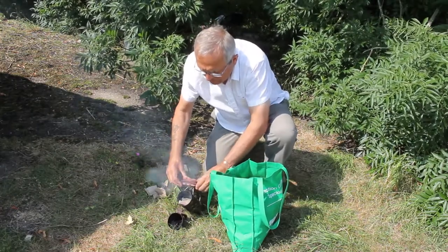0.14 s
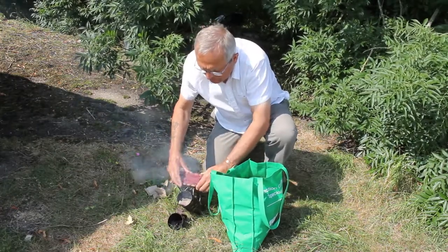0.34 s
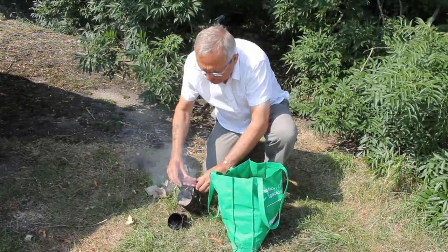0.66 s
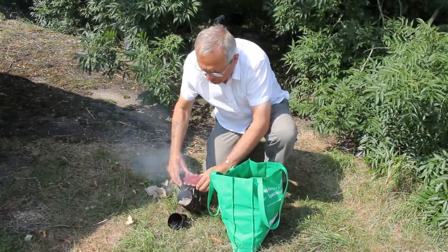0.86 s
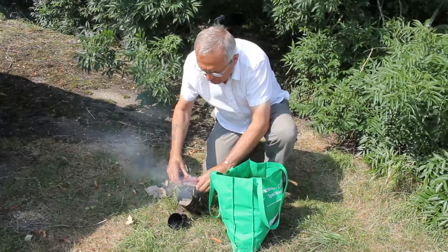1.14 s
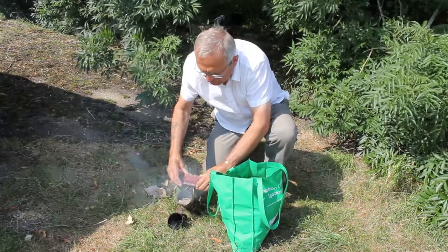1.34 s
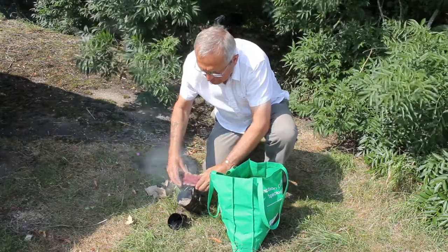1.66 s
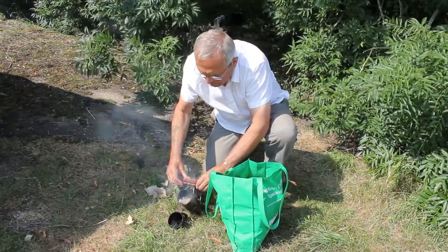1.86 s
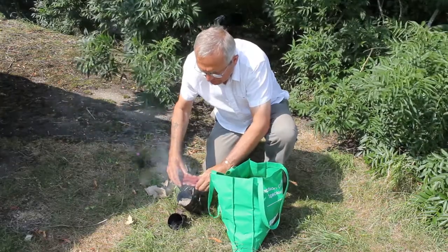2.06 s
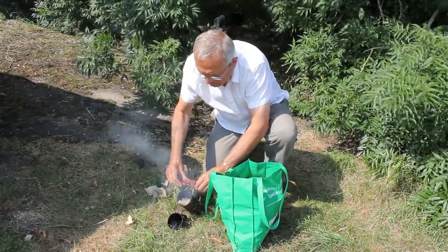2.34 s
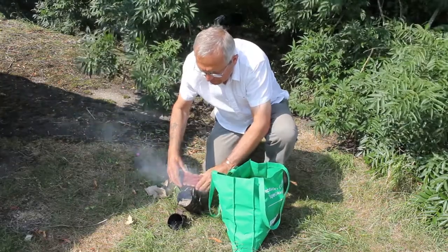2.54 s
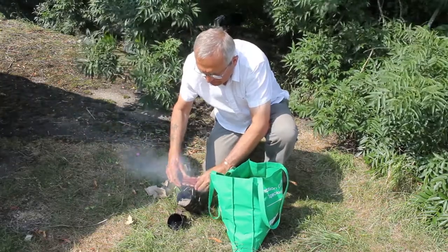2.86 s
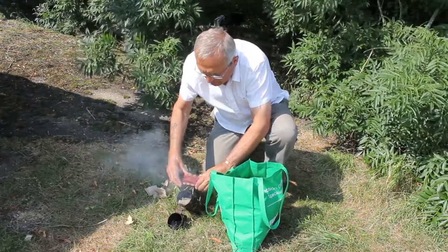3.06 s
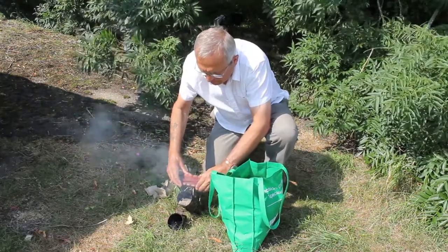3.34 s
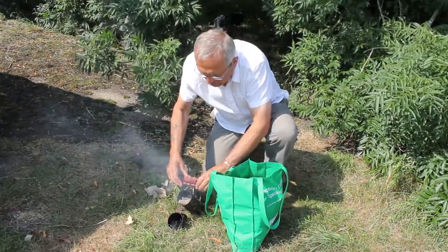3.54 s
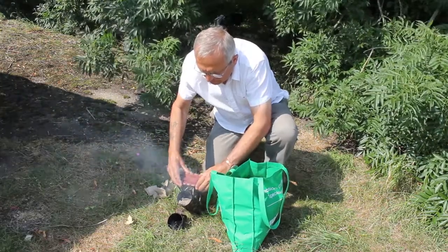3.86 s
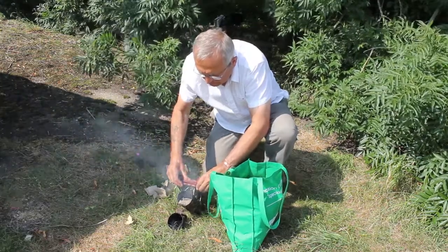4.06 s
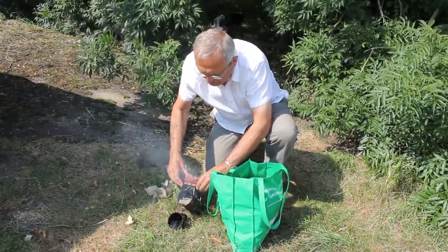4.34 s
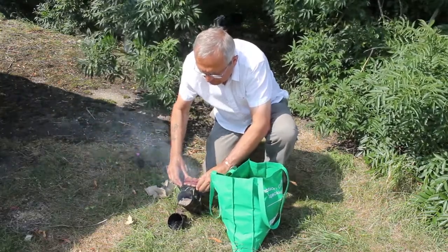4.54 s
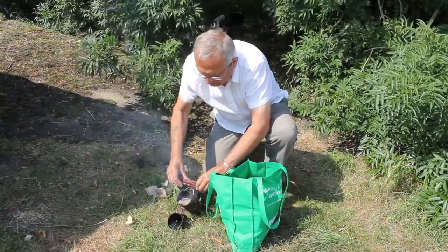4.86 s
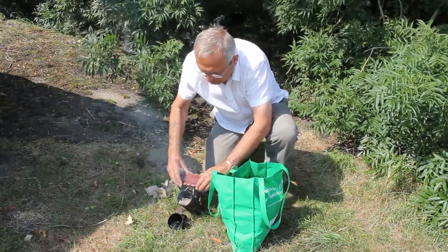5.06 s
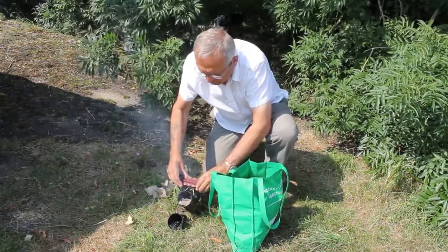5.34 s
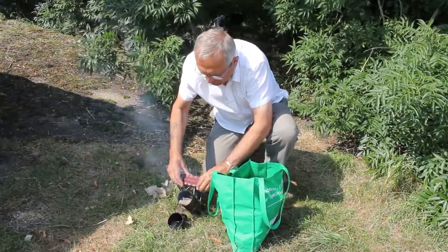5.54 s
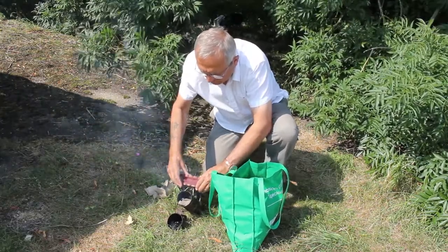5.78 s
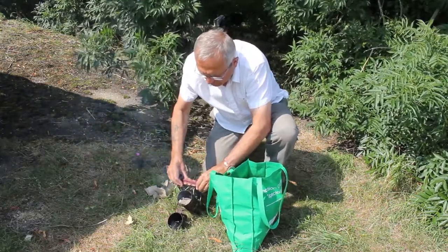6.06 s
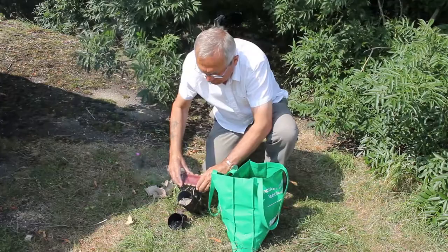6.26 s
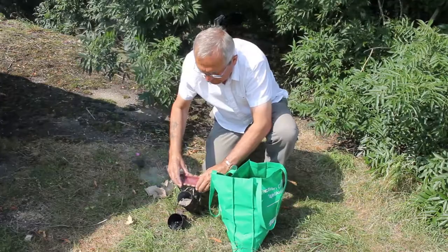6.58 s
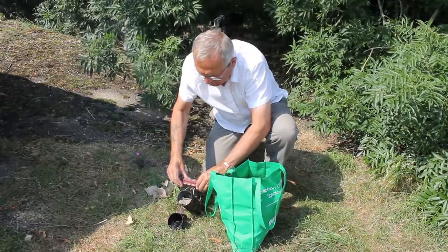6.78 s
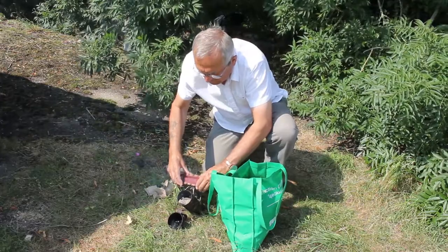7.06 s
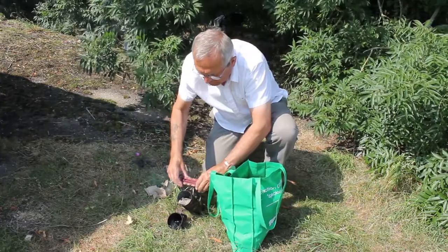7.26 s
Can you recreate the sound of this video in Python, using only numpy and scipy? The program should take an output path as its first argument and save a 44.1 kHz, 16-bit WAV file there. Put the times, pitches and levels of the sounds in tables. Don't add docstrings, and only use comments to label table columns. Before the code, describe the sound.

Small hand bellows pumped briskly outdoors, short breathy huffs roaring through a tin can, each followed by a thin hiss and a hard pop.

```python
import sys
import numpy as np
from scipy import signal
from scipy.fft import rfft, irfft, next_fast_len
from scipy.io import wavfile

SR = 44100
rng = np.random.default_rng(int(sys.argv[2]) if len(sys.argv) > 2 else 0)


def wav_record(signal):
    frames = np.transpose(np.atleast_2d(signal))
    bounded = np.clip(frames, -1, 1)
    quanta = np.round(bounded * 32767).astype(np.int16)
    wavfile.write(sys.argv[1], SR, quanta)


def how_loud(loudness_db):
    steps = np.asarray(loudness_db, float) / 20
    return 10 ** steps


N = 327222
T = np.arange(N) / SR

# (start [s], length [s], nozzle jet [dB], can roar [dB], cavity hoot [dB])
SQUEEZES = [(0.019, 0.15, -36, -23, -23), (0.505, 0.14, -37, -22.5, -22), (0.967, 0.13, -34, -22, -20.5),
            (1.417, 0.14, -37, -23, -24.5), (1.858, 0.14, -33, -20, -25), (2.294, 0.12, -34.5, -19.5, -29),
            (2.714, 0.12, -34, -21, -23), (3.145, 0.13, -32, -21.5, -23), (3.574, 0.13, -35, -20, -25.5),
            (3.993, 0.12, -33, -20.5, -23.5), (4.407, 0.12, -31, -19.5, -22.5),
            (4.826, 0.11, -31.5, -18.5, -25.5), (5.214, 0.12, -34.5, -20.5, -19),
            (5.618, 0.12, -32.5, -20, -23.5), (6.012, 0.11, -33.5, -22, -24.5),
            (6.39, 0.12, -32, -20.5, -22), (6.791, 0.12, -34, -21.5, -23.5), (7.159, 0.12, -30, -21.5, -20)]
RINGING_DB = [-2, -2.5, 0, -1, -6.5, -2.5, -3, -2, -6.5, 0, -4, 0.5, -2, -4, 1.7, 0.5, 0.7, 0.5]
# (frequency [Hz], density [dB per Hz])
JET_SPECTRUM = [(2350, -57), (4000, -5.5), (4640, -6.5), (5110, -4.5), (5340, -4.5), (6190, -7.5),
                (6980, -5), (9700, -4.5), (13000, -9), (15600, -17)]
# (frequency [Hz], density [dB per Hz])
ROAR_SPECTRUM = [(65, -35), (110, 1.5), (284, -5), (521, -3), (584, -5.5), (711, -26), (810, -8.5),
                 (1140, -11.5), (1530, -10), (1840, -10), (3150, -8), (4230, -21.5), (5500, -27.5),
                 (7150, -27), (12100, -120)]
# (frequency [Hz], width [Hz], level [dB])
CAN_MODES = [(1190, 180, 8), (1410, 91, 7.5), (2530, 77, -2), (2980, 170, 3), (3260, 71, -3),
             (3520, 280, 5.5), (3800, 140, 11)]
# (order, level [dB], length [s])
TUBE_PARTIALS = [(1, -17, 0.016), (2, 7, 0.0093), (3, -6.5, 0.0096), (4, 3.5, 0.0054)]
# (time [s], peak [dB], fourth partial [Hz])
WHISTLES = [(4.4368, -33, 5150), (4.8385, -30.5, 5040), (5.246, -29.5, 5040), (5.6448, -28.5, 5060),
            (6.0349, -25.5, 5020), (6.412, -24.5, 5000), (6.8064, -27, 5040), (7.1863, -27.5, 5020)]
# (fastest flow [s], stop [s], level [dB])
DRAWS = [(0.296, 0.437, -42), (0.805, 0.9, -40.5), (1.236, 1.373, -41.5), (1.694, 1.816, -40),
         (2.133, 2.243, -39.5), (2.557, 2.674, -40), (2.974, 3.064, -40.5), (3.378, 3.525, -40),
         (3.817, 3.93, -39.5), (4.257, 4.358, -41), (4.656, 4.786, -40), (5.09, 5.157, -39.5),
         (5.47, 5.55, -39.5), (5.847, 5.953, -41), (6.25, 6.344, -40), (6.643, 6.724, -40.5),
         (7.043, 7.108, -40), (7.393, 7.51, -39.5)]
# (frequency [Hz], density [dB per Hz])
INTAKE_SPECTRUM = [(1180, -29), (2000, 0), (2200, -5.5), (3150, -2.5), (3650, -6), (6000, -4), (6650, -7.5),
                   (8460, -5.5), (9780, -3.5), (14500, -19), (15600, -19)]
# (frequency [Hz], width [Hz], level [dB])
INLET_MODES = [(3100, 640, -1.5), (8600, 380, -5), (11830, 430, 4), (12600, 300, -7), (14300, 450, 8)]
# (time [s], boards [dB], plate [dB], hinge [dB])
POPS = [(0.4024, -9, -21, -8), (0.8807, -9, -30, -10), (1.3356, -9.5, -28, -12), (1.7832, -9.5, -42, -10),
        (2.202, -16, -27, -40.0), (2.2027, -7, -15, -1.5), (2.6206, -40, -24.9, -40.0),
        (2.622, -8.5, -24.7, 0), (3.0106, -6, -30, -9), (3.4602, -17, -24, -9), (3.4619, -11, -15, -2.5),
        (3.8906, -19, -40, -40), (3.8911, -7, -34, -1.5), (5.1194, -33, -12, -7), (5.12, -6.5, -15, 5.5),
        (5.4891, -5.5, -7.5, 0), (5.8874, -9.5, -5.5, -19), (6.266, -8.5, -6.5, -0.5),
        (6.6615, -10, -7, -4), (7.0475, -6.5, -4, -1.5), (7.4164, -7.5, -4.5, -15)]
# (frequency [Hz], level [dB], t60 [s])
BOARD_MODES = [(172, 0.3, 0.038), (352, 2.4, 0.021), (646, -5.3, 0.018), (1480, -11, 0.005)]
# (frequency [Hz], level [dB], t60 [s])
PLATE_MODES = [(837, 7.3, 0.0068), (1862, -2.4, 0.0032)]
# (frequency [Hz], level [dB], t60 [s])
HINGE_MODES = [(3330, 18, 0.0022)]
# (time [s], peak [dB], frequency [Hz], t60 [s])
TICKS = [(0.493, -17, 1430, 0.0039), (0.519, -35, 1290, 0.0044), (0.867, -24, 851, 0.0067),
         (0.959, -9, 1310, 0.0019), (1.32, -25, 859, 0.0091), (1.414, -10.5, 1410, 0.0027),
         (1.764, -15.5, 894, 0.0018), (1.858, -17, 840, 0.0061), (2.285, -9.5, 1190, 0.0017),
         (2.606, -13, 880, 0.0021), (2.714, -7, 1270, 0.0019), (3.141, -9.5, 1240, 0.0039),
         (3.563, -12, 1120, 0.0038), (3.862, -11, 1110, 0.0021), (3.985, -11, 1200, 0.003),
         (4.181, -28, 910, 0.005), (4.602, -26, 1180, 0.0071), (4.713, -17, 1140, 0.0033),
         (5.006, -27, 1200, 0.0058), (5.103, -12, 870, 0.0018), (5.211, -8, 1100, 0.0029),
         (5.612, -5, 1140, 0.0031), (6.783, -9.5, 1190, 0.0016), (7.198, -18, 800, 0.0025),
         (0.395, -29, 1000, 0.003), (1.905, -15, 1400, 0.0036)]
# (time [s], peak [dB], frequency [Hz], t60 [s])
FLAPS = [(0.542, -6, 312, 0.017), (1.01, -7.5, 264, 0.023), (1.467, -4.5, 269, 0.014),
         (2.3105, -9, 292, 0.037), (2.3185, -4.5, 250, 0.01), (2.489, -27, 325, 0.034),
         (3.588, -14, 340, 0.042), (3.619, -8.5, 275, 0.019), (4.409, -11, 258, 0.017),
         (4.599, -23.5, 338, 0.03), (4.817, -11, 205, 0.017), (5.006, -24, 326, 0.021),
         (5.439, -22, 282, 0.0094), (5.835, -18.5, 262, 0.014), (6.008, -14, 330, 0.037),
         (6.224, -21.5, 303, 0.018), (6.384, -18, 333, 0.041), (7.005, -21, 308, 0.014),
         (7.156, -12.5, 387, 0.0093), (7.372, -22.5, 312, 0.017), (0.52, -16, 436, 0.028),
         (1.899, -13, 302, 0.012), (2.057, -28, 366, 0.025), (3.131, -24, 476, 0.018),
         (3.979, -17.5, 417, 0.025), (5.586, -24, 406, 0.035), (6.784, -14.5, 318, 0.03),
         (2.78, -18.5, 298, 0.015)]
# (time [s], peak [dB], frequency [Hz], t60 [s])
TWANGS = [
    (2.2228, -12.5, 940, 0.011),
    (2.2228, -25, 1750, 0.02),
]
# (time [s], peak [dB], frequency [Hz], t60 [s])
CREAKS = [(1.397, -42, 1340, 0.031), (1.833, -28, 1340, 0.032), (2.229, -30, 930, 0.03),
          (2.688, -28, 1310, 0.035), (3.975, -27, 1250, 0.07), (5.184, -38, 1190, 0.035),
          (5.587, -20.5, 1250, 0.052), (5.99, -31, 1400, 0.035), (6.334, -24, 1630, 0.053),
          (6.357, -29, 1320, 0.038), (7.124, -19.5, 1690, 0.035)]
# (time [s], peak [dB], frequency [Hz], t60 [s])
CATCHES = [
    (2.4045, -17, 3140, 0.021),
    (3.9704, -18.5, 3200, 0.02),
    (4.513, -18, 3840, 0.012),
    (6.0236, -17, 2550, 0.019),
    (6.5, -20, 3200, 0.017),
]
# (time [s], rumble [dB])
WIND = [(0.0, -26), (0.02, -23), (0.23, -28), (0.27, -13.5), (0.31, -23), (0.87, -15.5), (0.95, -34.5),
        (1.4, -24.5), (1.45, -22.5), (2.69, -31.5), (2.79, -23), (4.32, -37.5), (5.1, -28.5), (5.16, -39),
        (5.95, -36), (5.97, -28), (7.13, -32), (7.42, -34)]
# (time [s], level re wind [dB])
GUSTS = [(.26, 1.5), (.85, -1.5), (.73, -7), (1.28, 4), (1.47, 5.5), (1.95, -2), (2.6, 6), (2.85, 5),
         (3.06, 0), (3.4, -2.5), (3.66, -3), (4.59, -7), (5.19, -3), (5.27, 2), (6.88, 4.5), (.97, 2),
         (1.83, 0.5), (2.45, -1), (3.95, 3.5), (4.72, 3.5), (5.95, 0), (7.2, 7), (.07, -6)]
# (time [s], level [dB])
BUFFET_BUMPS = [(.3, 1.5), (.65, 1.5), (.95, 8), (1.1, 2), (1.3, 2), (1.6, -3), (1.95, 11.5), (2.1, 7), (2.45, 1),
                (2.65, -2), (2.95, 2), (3.05, 1), (3.38, -19), (3.6, 7), (4.15, 4), (4.5, -4), (4.95, 4),
                (5.25, -2), (5.8, -1), (6.15, -16), (6.65, 13), (6.85, -8), (7.02, -1.5), (7.3, 3)]
# (frequency [Hz], density [dB per Hz])
RUMBLE_SPECTRUM = [(8.8, -38), (15, -6.5), (59, 3.5), (108, -6), (200, -17.5), (260, -67), (440, -120)]
# (frequency [Hz], density [dB per Hz])
BUFFET_SPECTRUM = [(70, -0.5), (100, 5.5), (170, -3.0), (240, -7.5), (330, -17), (500, -32)]
# (time [s], length [s], start [Hz], end [Hz], level [dB])
BIRD = [(.17, .03, 3780, 4050, -44), (.185, .07, 4030, 3930, -42), (.24, .035, 3700, 3700, -43),
        (0.474, .055, 4350, 4340, -41), (0.685, .06, 4300, 4300, -42), (1.157, .03, 8200, 10400, -42),
        (3.04, 0.1, 4150, 4130, -43), (4.26, .04, 4300, 4380, -43), (4.285, .05, 4390, 4270, -41),
        (4.37, .075, 3930, 4130, -40), (4.745, .06, 4130, 4300, -44)]
# (frequency [Hz], density [dB per Hz])
FAR_SPECTRUM = [(88, -23), (150, 6.5), (226, -15), (314, -7), (682, -14.5), (1030, -15.5), (1200, -14),
                (1840, -20.5), (3230, -12), (3700, -15), (6620, -25.5), (8520, -27), (11600, -31),
                (14700, -34), (15600, -32)]
# (frequency [Hz], density [dB per Hz])
HISS_SPECTRUM = [(150, -17), (600, -1.0), (2500, -6.0), (5000, -4.0), (15000, -1.5)]

ROAR_OPEN_DB, ROAR_SAG_DB, ROAR_REST_DB = -6, -10, -57.5
HOOT_OPEN_DB, HOOT_SAG_DB, HOOT_REST_DB = -4, -10.5, -51


def squeezes():
    start, length, jet_share = strokes()
    jet_db, roar_db, hoot_db = np.transpose(SQUEEZES)[2:]
    roar_share = roar_peak_share(start)
    open_db = ROAR_OPEN_DB - 0.74 * start
    roar = pressure(roar_db, roar_share, open_db, ROAR_SAG_DB, ROAR_REST_DB)
    ringing = pressure(roar_db + RINGING_DB, roar_share, open_db, -11, ROAR_REST_DB)
    hoot = pressure(hoot_db, 0.14 + 0.018 * start, HOOT_OPEN_DB, HOOT_SAG_DB, HOOT_REST_DB)

    peak = start + jet_share * length
    flow = swells(zip(peak, jet_share * length, (1 - jet_share) * length, jet_db), point=2.13)
    jet = (flow + how_loud(-12.0) * roar) * coloured(JET_SPECTRUM, patchy_db=1.0, rate_hz=49)

    turbulence = how_loud(1.57 * drift(40))
    air = coloured(ROAR_SPECTRUM, patchy_db=0.5, rate_hz=31)
    tin = sum(how_loud(db + 2.4 * drift(47)) * resonance(air, hz, width_hz) for hz, width_hz, db in CAN_MODES)
    can = turbulence * (roar * how_loud(-2.5) * air + ringing * how_loud(-6.0) * rms_one(tin))

    cavity = resonance(rng.standard_normal(N), 587, 46)
    return how_loud(0.26) * jet + how_loud(2.5) * can + how_loud(-6.0) * hoot * rms_one(cavity)


def crackle():
    crackles_per_s, level_db = 400, -10
    start, _, _ = strokes()
    roar_db = np.transpose(SQUEEZES)[3]
    blow = pressure(roar_db, roar_peak_share(start), ROAR_OPEN_DB, ROAR_SAG_DB, ROAR_REST_DB)
    chance, size, pick = rng.random((3, N))
    sparks = (chance < crackles_per_s / SR) * how_loud(-3.5 * np.log(size + 0.05))
    pitch_index = (pick * 8).astype(int)
    grains = np.zeros(N)
    for k, hz in enumerate(np.geomspace(2400, 4100, 8)):
        grains += struck(sparks * (pitch_index == k), hz, 30 / hz)
    return how_loud(level_db) * blow * rms_one(resonance(grains, 3360, 2100))


def whistles():
    out, lag_s = np.zeros(N), 0.0035
    span = np.arange(-3000, 3000)
    t = span / SR
    for order, share_db, length_s in TUBE_PARTIALS:
        wobble = how_loud(1.5 * drift(70))
        for s, db, hz in WHISTLES:
            near = int((s + lag_s) * SR) + span
            phase = 2 * np.pi * order / 4 * (hz * t - 4500 * t * t)
            swell = np.exp(-(t / length_s) ** 2)
            out[near] += how_loud(db + share_db) * wobble[near] * swell * np.sin(phase)
    return out


def draws():
    lag_s = 0.035
    start, length, _ = strokes()
    peak, stop, db = np.transpose(DRAWS)
    flow = swells(zip(peak, peak - start - length - lag_s, stop - peak, db), point=1.0)
    air = coloured(INTAKE_SPECTRUM, patchy_db=0.9, rate_hz=12.0)
    bands = sum(how_loud(db) * resonance(air, hz, width_hz) for hz, width_hz, db in INLET_MODES)
    return flow * how_loud(4.5) * rms_one(air + bands)


def pops():
    contact_s, ground_s, ground_db, rattle_t60_s = 0.00012, 0.0034, -13, 0.04
    s, boards_db, plate_db, hinge_db = np.transpose(POPS)
    rings = np.zeros(N)
    for modes, blow_db in ((BOARD_MODES, boards_db), (PLATE_MODES, plate_db), (HINGE_MODES, hinge_db)):
        blows = clicks(s, blow_db)
        for hz, db, t60_s in modes:
            rings += how_loud(db) * struck(blows, hz, t60_s)

    contact = np.exp(-0.5 * (np.arange(-40, 41) / SR / contact_s) ** 2)
    body = np.convolve(rings, contact / contact.sum(), "same")
    body = signal.lfilter([1, -1], [1, -np.exp(-2 * np.pi * 326 / SR)], body)

    dull = signal.lfilter([0.25], [1, -0.75], body)
    echo = np.roll(dull, round(ground_s * SR)) * (T > 0.1)

    shaken = signal.lfilter([1], [1, -how_loud(-60 / (rattle_t60_s * SR))], clicks(s + 0.00044, boards_db - 18.5))
    loose = resonance(resonance(rng.standard_normal(N), 1160, 790), 1000, 1140)
    return body + how_loud(ground_db) * echo + shaken * rms_one(loose)


def knocks(rows, soft_s):
    out, t = np.zeros(N + 3000), np.arange(3000) / SR
    for s, db, hz, t60_s in rows:
        decay = how_loud(-60 * t / max(t60_s, 0.002))
        ring = np.sin(2 * np.pi * hz * t) * decay * (1 - np.exp(-t / soft_s))
        at = int(s * SR) + 30
        out[at:at + 3000] += how_loud(db) * ring / abs(ring).max()
    return out[:N]


def creaks(rows, spring_db):
    rise_s, spring_ratio, scrape_db = 0.001, 1.9, -3
    out, t = np.zeros(N + 3000), np.arange(3000) / SR
    for s, db, hz, t60_s in rows:
        noise = rng.standard_normal(3000)
        slips = noise * (1 - np.exp(-t / rise_s)) + 3.5 * (t == 0)
        slips = slips * how_loud(-60 * t / max(t60_s, 0.004))
        leather = resonance(resonance(slips, hz, 580), hz, 580)
        spring = resonance(resonance(slips, spring_ratio * hz, 580), spring_ratio * hz, 580)
        scrape = resonance(resonance(slips, 670, 1300), 670, 1300)
        burst = leather + how_loud(spring_db) * spring + how_loud(scrape_db) * scrape
        at = int(s * SR)
        out[at:at + 3000] += how_loud(db) * burst / abs(burst).max()
    return out[:N]


def wind():
    wind_db = np.interp(T, *np.transpose(WIND))
    gust_db = bumps_db(GUSTS)
    rumble = coloured(RUMBLE_SPECTRUM, patchy_db=1.0, rate_hz=60)
    buffet = coloured(BUFFET_SPECTRUM, patchy_db=5.5, rate_hz=18)
    swing_db = wind_db - wind_db.mean() + 1.1 * gust_db
    buffet_db = -34.5 + 0.49 * swing_db + bumps_db(BUFFET_BUMPS)
    return how_loud(wind_db + gust_db + 1.0) * rumble + how_loud(buffet_db) * buffet


def bird():
    out, waver_rad = np.zeros(N), drift(45)
    for s, length, start_hz, end_hz, db in BIRD:
        near = slice(int(s * SR), int((s + length) * SR))
        part = np.clip((T[near] - s) / length, 0, 1)
        phase = 2 * np.pi * length * (start_hz * part + (end_hz - start_hz) * part ** 2 / 2)
        swell = np.sqrt(np.sin(np.pi * part).clip(0))
        out[near] += how_loud(db) * swell * np.sin(phase + waver_rad[near])
    return out * how_loud(1.5 * drift(50) - 1)


def far_hum():
    return how_loud(-38) * coloured(FAR_SPECTRUM, patchy_db=1.5, rate_hz=26)


def channel_hiss():
    return how_loud(-56) * coloured(HISS_SPECTRUM, patchy_db=-6.5, rate_hz=0.96) * [[1], [-1]]


def strokes():
    start, length = np.transpose(SQUEEZES)[:2]
    return start, length, 0.5 - 0.019 * start


def roar_peak_share(start):
    return 0.25 - 0.0085 * start


def pressure(peak_db, peak_share, open_db, sag_db, rest_db):
    swell_s, die_s, linger_s, sag_share, end_db = 0.046, 0.0064, 0.007, 0.82, -27.5
    start, length, _ = strokes()
    end = start + length + die_s
    peak, sag = start + peak_share * length, start + sag_share * length
    rest = np.full(len(start), rest_db)
    s = [start - swell_s, start, peak, sag, end, end + linger_s]
    db = [rest, peak_db + open_db, peak_db, peak_db + sag_db, peak_db + end_db, rest]
    return how_loud(np.interp(T, np.ravel(s, "F"), np.ravel(db, "F")))


def swells(rows, point):
    flow = np.zeros(N)
    for s, rise_s, fall_s, db in rows:
        near = slice(max(int((s - rise_s) * SR), 0), int((s + fall_s) * SR))
        t = T[near]
        part = np.clip(np.where(t < s, (s - t) / rise_s, (t - s) / fall_s), 0, 1)
        flow[near] += how_loud(db) * np.cos(part * np.pi / 2) ** point
    return flow


def bumps_db(rows):
    return sum(np.interp(T, [s - 0.08, s, s + 0.08], [0, db, 0]) for s, db in rows)


def coloured(spectrum, patchy_db, rate_hz):
    size = next_fast_len(N)
    hz = np.maximum(np.arange(size // 2 + 1) * SR / size, 1)
    points_hz, levels_db = np.transpose(spectrum)
    shape_db = np.interp(np.log(hz), np.log(points_hz), levels_db, -90, -90)
    bins = rfft(rng.standard_normal(size)) * how_loud(shape_db)
    octave = np.log2(hz / points_hz[0])
    out = np.zeros(N)
    for k in range(int(np.log2(points_hz[-1] / points_hz[0])) + 2):
        share = np.clip(1 - abs(octave - k), 0, 1)
        out += irfft(bins * share, size)[:N] * how_loud(patchy_db * drift(rate_hz))
    return rms_one(out)


def drift(rate_hz):
    r = np.exp(-2 * np.pi * rate_hz * 40 / SR)
    slow = signal.lfilter([1], [1, -2 * r, r * r], rng.standard_normal(N // 40 + 2002))[2000:]
    return np.interp(np.arange(N) / 40, np.arange(len(slow)), rms_one(slow))


def resonance(x, hz, width_hz):
    r = np.exp(-np.pi * width_hz / SR)
    gain = (1 - r * r) / 2
    return signal.lfilter([gain, 0, -gain], [1, -2 * r * np.cos(2 * np.pi * hz / SR), r * r], x)


def struck(x, hz, t60_s):
    r, c = how_loud(-60 / (t60_s * SR)), np.cos(2 * np.pi * hz / SR)
    return signal.lfilter([1, -r * c], [1, -2 * r * c, r * r], x + 1e-18)


def clicks(times_s, db):
    out = np.zeros(N)
    out[np.minimum((np.asarray(times_s) * SR).astype(int), N - 1)] = how_loud(db)
    return out


def rms_one(x):
    return x / np.sqrt(np.mean(x ** 2) + 1e-20)


def scene():
    air = squeezes() + crackle() + whistles() + draws()
    contacts = pops() + knocks(TWANGS, soft_s=0.0024)
    contacts -= knocks(TICKS, soft_s=0.000093) + knocks(FLAPS, soft_s=0.00096)
    contacts += creaks(CREAKS, spring_db=-13) + creaks(CATCHES, spring_db=-40)
    background = wind() + bird() + far_hum()
    return air + contacts + background + channel_hiss()


def band_limit(x):
    return signal.sosfilt(signal.butter(12, 15500, fs=SR, output="sos"), x)


def record(dry):
    mix = np.clip(dry, -1, 1)
    return band_limit(mix)


dry = scene()
out = record(dry)
wav_record(out)
```